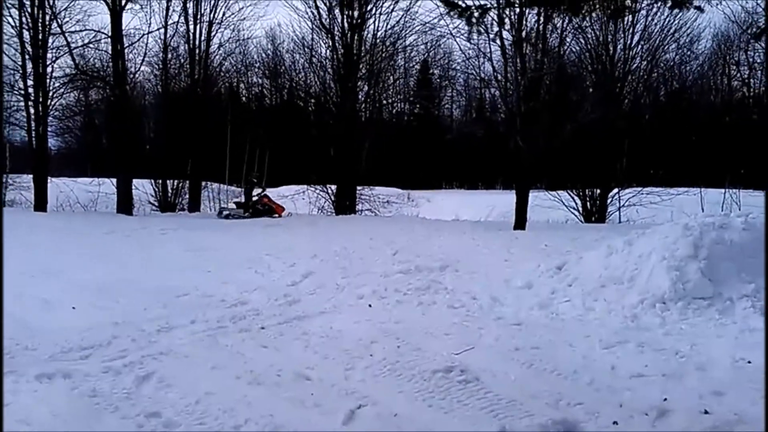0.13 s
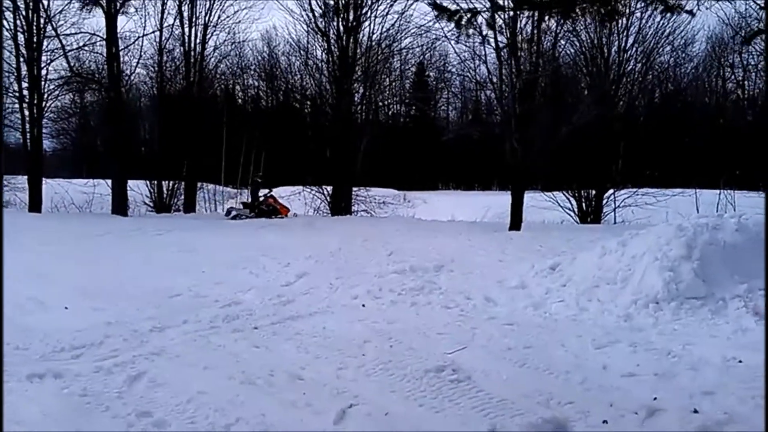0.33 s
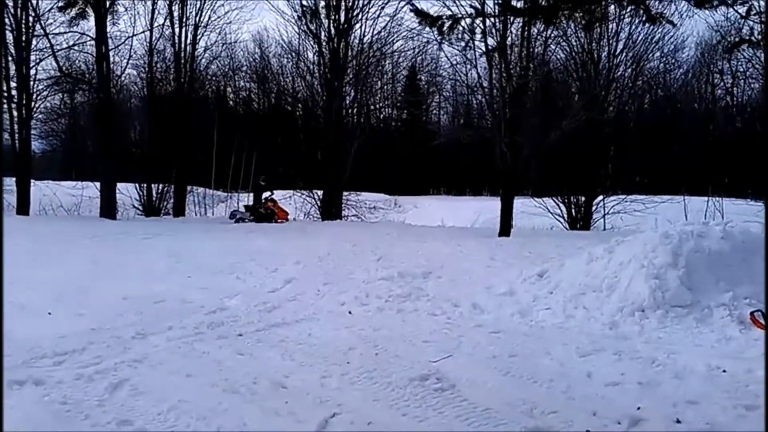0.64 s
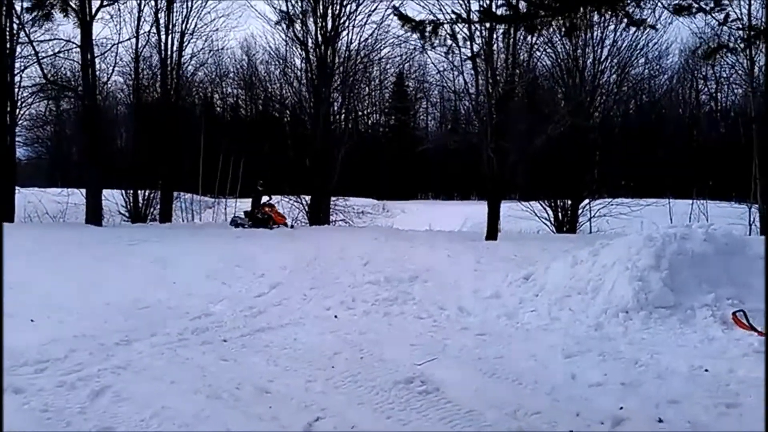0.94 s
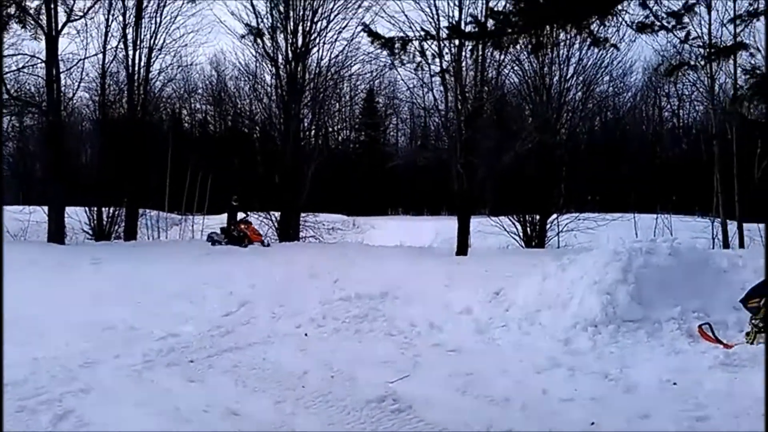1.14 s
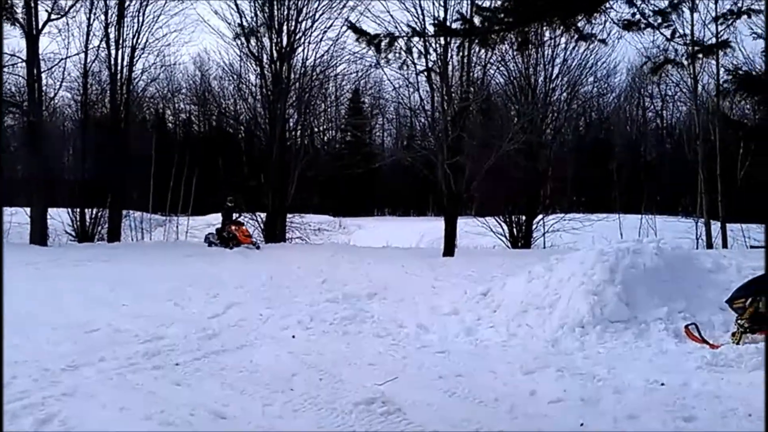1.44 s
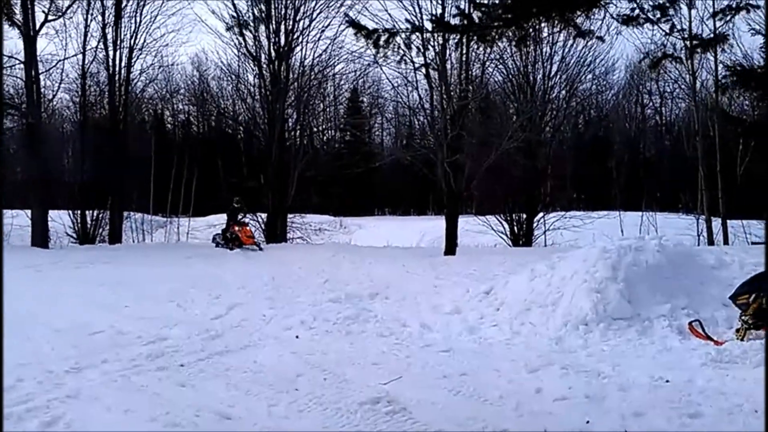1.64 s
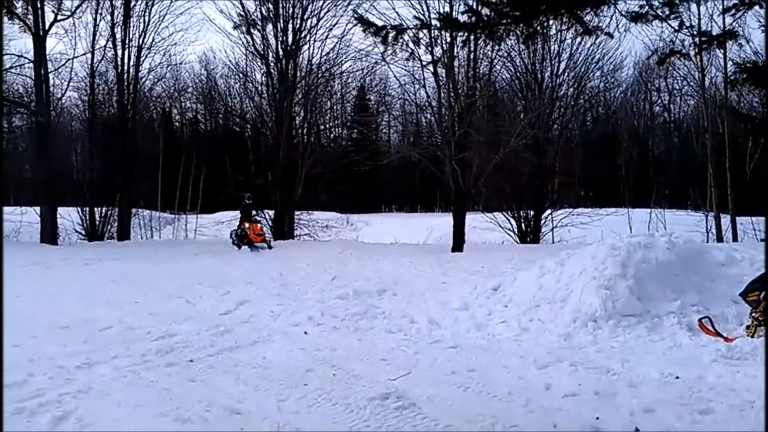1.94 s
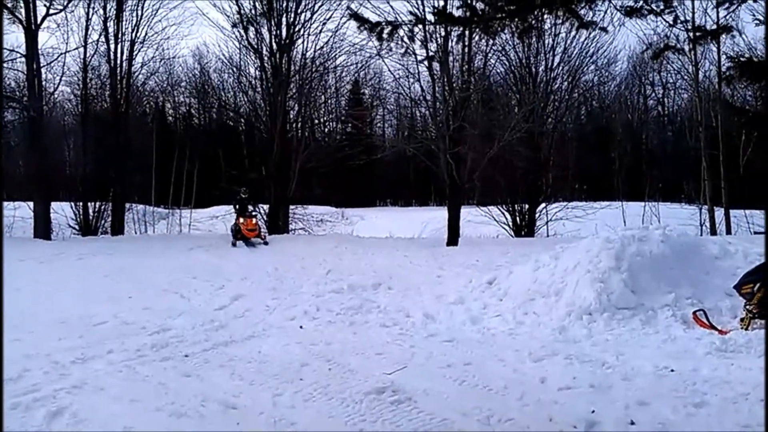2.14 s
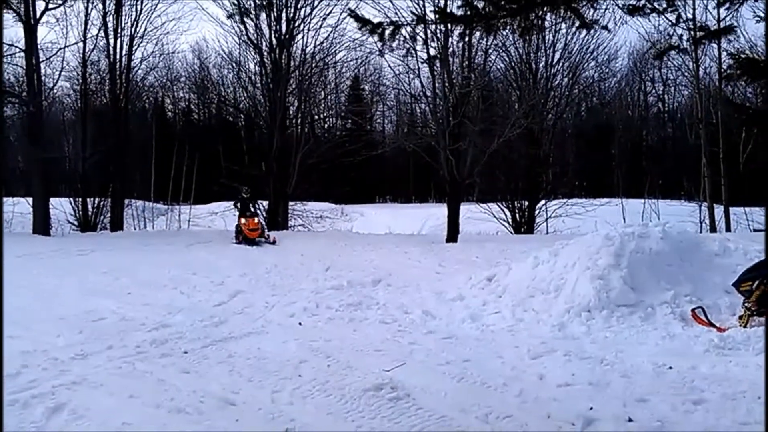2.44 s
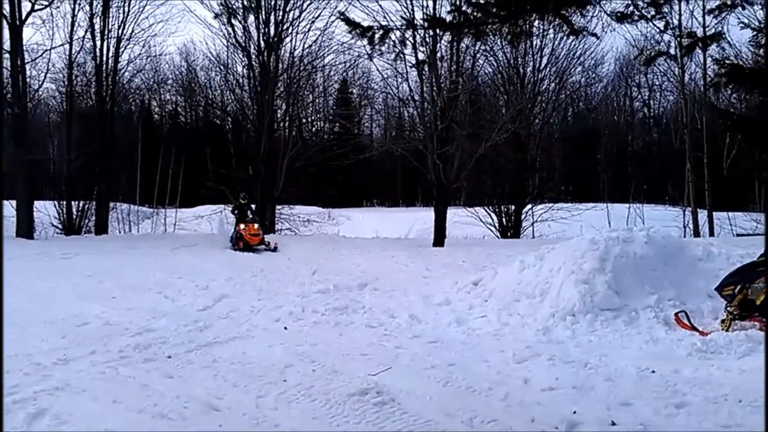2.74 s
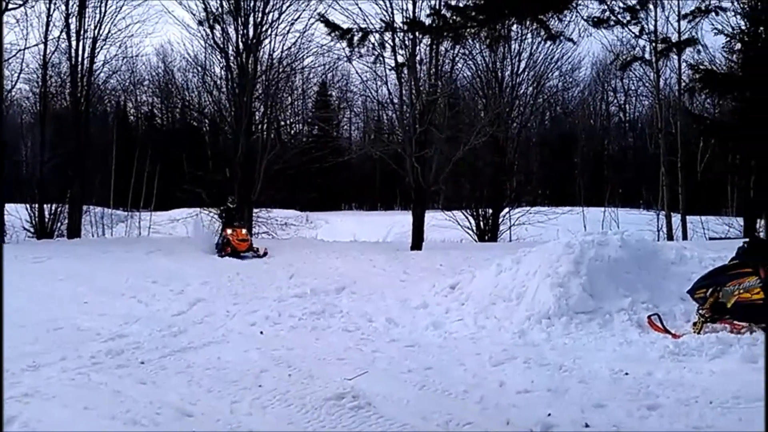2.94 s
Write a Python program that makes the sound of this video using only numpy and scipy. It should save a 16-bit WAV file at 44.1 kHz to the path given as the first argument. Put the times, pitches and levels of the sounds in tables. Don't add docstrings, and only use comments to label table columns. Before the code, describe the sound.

A two-stroke snowmobile some way off gives three short raspy throttle bursts, then accelerates with climbing pitch, while boots crunch snow nearby; open snowy field by trees, thin handheld camera microphone with little bass.

```python
import sys
import numpy as np
from scipy import signal
from scipy.fft import rfft, irfft, next_fast_len
from scipy.io import wavfile
from scipy.ndimage import uniform_filter1d, minimum_filter1d, map_coordinates

SR = 44100
rng = np.random.default_rng(int(sys.argv[2]) if len(sys.argv) > 2 else 0)


def to_wav(sig):
    pcm = np.clip(np.atleast_2d(sig), -1, 1) * 32767
    pcm = np.round(pcm).astype(np.int16)
    wavfile.write(sys.argv[1], SR, pcm.T)


def ratio_of_db(decibels):
    return 10 ** (np.asarray(decibels, float) / 20)


N = 136710
TIME_S = np.arange(N) / SR

# freq_hz, density_db_per_hz
SNOW_HISS = [(1470, -42), (2500, -4), (2620, -9), (4120, -4.5), (5180, -12), (5960, -12.5), (7410, -17.5),
             (8050, -14), (10200, -22), (13200, -68), (22000, -120)]


def unit(x):
    return x / np.sqrt(np.mean(x ** 2) + 1e-20)


def along(points, hz):
    f, v = np.transpose(points)
    return np.interp(np.log(hz + 1), np.log(f + 1), v)


def curve(rows):
    s, v = np.transpose(rows)
    return np.interp(TIME_S, s, v)


def bell(centre_s, half_s):
    return np.exp(-((TIME_S - centre_s) / half_s) ** 2)


def wobble(rate):
    return map_coordinates(rng.standard_normal(int(N * rate / SR) + 4), [np.arange(N) * rate / SR])


def filtered(x, response):
    m = next_fast_len(N + SR // 2)
    return irfft(rfft(x, m) * response(np.fft.rfftfreq(m, 1 / SR)), m)[..., :N]


def coloured(x, spectrum):
    return unit(filtered(x, lambda hz: ratio_of_db(along(spectrum, hz))))


def patchy(patchy_db):
    z = signal.stft(rng.standard_normal(N), nperseg=512)[2]
    field = uniform_filter1d(rng.standard_normal(z.shape), 4, 0)
    field = uniform_filter1d(field, 5, 1)
    broad = uniform_filter1d(uniform_filter1d(field, size=5, axis=0), size=16, axis=1)
    field = unit(field) + 0.31 * unit(broad)
    return unit(signal.istft(z * ratio_of_db(patchy_db * unit(field)), nperseg=512)[1][:N])


def engine():
    # time_s, speed_rev_per_s
    coast_speed = [(0, 77), (.55, 66), (.62, 63), (.8, 76), (1.1, 66), (1.45, 61)]
    blip_speed = [(1.52, 65), (1.64, 81), (1.69, 80)]
    pull_speed = [(2.05, 65.0), (2.108, 67.8), (2.198, 80.6), (2.392, 74.0), (2.482, 77.0), (2.664, 92.9),
                  (2.848, 106.7), (2.97, 113.4), (3.1, 116.4)]
    # time_s, exhaust_level_db
    load_rows = [(0, -27), (.13, -45), (.59, -44.5), (.67, -19.5), (.81, -24.5), (.85, -36.5),
                 (1.45, -41.5), (1.53, -20.5), (1.64, -22.5), (1.69, -35), (1.97, -44), (2.035, -30),
                 (2.065, -24), (2.17, -20.5), (2.2, -25.5), (2.33, -31), (2.5, -24.5), (3.1, -28.5)]
    # time_s, share_0_to_1
    even_rows = [(0, .1), (1.5, .1), (1.62, .35), (1.72, .15), (2.05, .15), (2.2, .5), (2.45, .42),
                 (2.7, .58), (3.1, .7)]
    # crank_multiple, time_s, half_length_s, level_db_over_exhaust
    song_orders = [(4, 1.6, 0.067, -22), (4, 2.142, 0.068, -15.5), (4, 2.47, 0.12, -18),
                   (5, 1.6, 0.043, -37.5), (5, 1.3, .1, -42), (4, 2.74, 0.069, -13.5),
                   (5, 2.73, 0.056, -12.5), (4, 2.99, 0.14, -20), (2, 2.994, 0.16, -24.5),
                   (6, 3.04, 0.071, -11.5), (7, 3.03, 0.063, -13.5), (10, 2.5, 0.036, -8),
                   (14, 0.92, 0.018, -8), (10, 2.87, 0.13, -6), (22, 3.04, 0.11, -15.5),
                   (23, 3.05, 0.082, -17), (4, 2.28, 0.096, -28), (17, 2.3, 0.054, -10),
                   (8, 2.537, 0.063, -30), (9, 2.722, 0.079, -11.5), (7, 2.1, 0.086, -30.5),
                   (14, 2.79, 0.048, -3), (4, 2.62, .05, -23), (5, 2.63, 0.037, -22),
                   (10, 2.53, 0.035, -20), (5, 2.08, 0.037, -19.5), (8, 2.21, .04, -16.5),
                   (15, 1.7, 0.034, -11.5), (11, 2.9, 0.062, -10.5), (12, 2.5, 0.041, -14.5),
                   (18, 2.93, 0.042, -11), (21, 2.9, .05, -12), (15, 3, 0.048, -7)]
    # time_s, half_length_s, exhaust_db, rasp_db
    stumbles = [(0.607, 0.017, 7.5, 12.5), (0.674, .008, 1, 1.5), (0.709, 0.0068, -3.5, 4.5),
                (0.719, 0.005, -4, -4), (0.738, 0.006, 1.5, 2), (.77, .025, -1, 0.5), (0.827, .015, -2, -4),
                (1.434, .012, 7.5, -4), (1.485, 0.019, 5.5, 10), (1.532, 0.011, -0.5, -0.5),
                (1.582, .006, 3.5, 4), (1.612, 0.0059, -2.5, -4), (1.633, 0.01, 0, -0.5),
                (1.665, 0.017, 0.5, -12), (1.988, 0.019, 5, 8), (2.07, 0.013, 2.5, 3),
                (2.11, 0.023, -2.5, -4), (2.146, .008, 3, 0.5), (2.16, 0.011, 3, 4), (2.187, 0.013, -3, -8),
                (2.238, 0.013, 1, -4), (2.376, 0.052, 1, -7), (2.43, 0.022, -1.5, -3.5),
                (2.464, 0.013, 1.5, 0), (2.6, .015, -1, -2), (2.779, 0.013, 3, 1.5)]
    # freq_hz, density_db_per_hz
    exhaust_low = [(200, -52), (330, -22), (600, -19.5), (800, -10), (930, -12.5), (1200, 1), (1600, -7),
                   (1930, 0)]
    exhaust_high = [(2250, -11.5), (2800, -24.5), (3700, -27.5), (6400, -120)]
    rasp_spectrum = [(1350, -37), (2300, -9), (2820, -13), (3200, -0.5), (3430, -11.5), (4260, -5.5),
                     (7050, -14.5), (8550, -10.5), (10200, -26.5), (13200, -82), (22000, -120)]

    speed = curve(list(coast_speed) + list(blip_speed) + [(1.98, 60.17)] + list(pull_speed))
    speed = uniform_filter1d(speed, size=1500, mode="nearest")
    crank = 2 * np.pi * np.cumsum(speed) / SR
    load_db, even = curve(load_rows), curve(even_rows)
    rasp_db = -43.5 + (load_db + 25)
    for s, half_s, exhaust_step_db, rasp_step_db in stumbles:
        load_db = load_db + exhaust_step_db * bell(s, half_s)
        rasp_db = rasp_db + rasp_step_db * bell(s, half_s)

    pipe = [(110, -100)] + list(exhaust_low) + list(exhaust_high)
    order = {}
    for k in range(2, 42):
        drift = 1.6 * wobble(4) + .3 * wobble(40)
        order[k] = np.cos(k * crank + np.tanh(k / 8) ** 2 * drift)
    stack = sum(ratio_of_db(along(pipe, k * speed) + 2.2 * wobble(11)) * order[k] for k in range(6, 42))
    stack *= np.sqrt(speed / speed.mean())
    drone = 0
    for k, s, half_s, level_db in song_orders:
        drone = drone + ratio_of_db(level_db) * np.exp(-((TIME_S - s) / half_s) ** 4) * order[round(k)]

    gate = 1 + 0.15 * np.cos(crank) + 0.19 * np.cos(2 * crank + wobble(5.56))
    puff_cut_hz = 360
    puffs = coloured(patchy(patchy_db=1.5) * gate * ratio_of_db(0.73 * wobble(60)), pipe)
    puffs = filtered(puffs, lambda hz: (1j * hz / (puff_cut_hz + 1j * hz)) ** 2)
    exhaust = np.sqrt(even) * unit(stack) + drone + np.sqrt(1 - even) * puffs
    rasp = coloured(patchy(patchy_db=1.85) * gate * ratio_of_db(0.66 * wobble(25.36)), rasp_spectrum)
    lurch_db = .6 * wobble(24.38)
    return ratio_of_db(load_db + lurch_db) * exhaust + ratio_of_db(rasp_db) * rasp


def boots():
    # start_s, length_s, thud_db, thud_hz, crackle_db
    crunches = [(0.039, 0.064, -42, 800, -43.5), (0.391, 0.064, -53, 550, -57),
                (.6, 0.11, -37.5, 330, -42.5), (0.801, .25, -59, 210, -62), (0.696, 0.024, -28, 680, -56),
                (0.711, 0.062, -38, 334, -37.5), (1.068, 0.061, -42, 640, -38.5),
                (1.419, 0.16, -47, 358, -53), (1.799, 0.18, -52.5, 250, -60.5), (1.922, .17, -45, 308, -54),
                (0.118, 0.48, -58.5, 237, -67), (1.002, 0.46, -63.5, 224, -62), (1.998, .2, -54, 260, -58),
                (2.599, .06, -60.5, 218, -65)]
    # start_s, peak_db
    ticks = [
        (.0553, -22),
        (.0708, -21),
        (1.077, -23),
        (1.0925, -23),
        (1.1012, -22),
    ]
    # start_s, peak_db, pitch_hz
    knocks = [(.615, -31, 360), (.632, -31, 310), (.662, -32, 320), (.699, -18, 305), (.718, -30, 310),
              (1.893, -33, 290), (1.912, -32, 340), (1.93, -35, 290), (1.972, -35, 290), (2.012, -34, 300),
              (2.04, -34, 310)]

    sound = np.zeros((2, N + SR))
    lean = ratio_of_db(-3.5 * np.array([[.5], [-.5]]))
    half_second = SR // 2
    t, tick_t = np.arange(half_second) / SR, np.arange(900) / SR
    freq_hz = np.fft.rfftfreq(half_second, 1 / SR)
    bandwidth_over_pitch, common = .55, .35

    crackle = rng.standard_normal((2, N)) * ratio_of_db(1.8 * wobble(300))
    crackle = filtered(crackle, lambda hz: ratio_of_db(along(SNOW_HISS, hz)))
    swell = np.zeros(N)
    for s, length_s, thud_db, pitch_hz, crackle_db in crunches:
        swell += ratio_of_db(crackle_db) * np.exp(-((TIME_S - s) / length_s * 2 - 1) ** 2 * 1.1)
        centre, *each = rng.standard_normal((3, half_second))
        noise = np.sqrt(common) * centre + np.sqrt(1 - common) * np.array(each)
        damping = 1j * freq_hz * pitch_hz * bandwidth_over_pitch
        band = damping / (pitch_hz ** 2 - freq_hz ** 2 + damping)
        thud = irfft(rfft(noise) * band ** 2, half_second)
        thud = unit(thud * np.exp(-2 * (t / length_s * 2 - 1) ** 2))
        thud *= np.sqrt(length_s * SR / half_second)
        sound[:, round(s * SR):][:, :half_second] += ratio_of_db(thud_db) * lean * thud
    for s, peak_db in ticks:
        phase = 2 * np.pi * (1000 * tick_t + 1.1 * (1 - np.exp(-tick_t / .001)))
        chirp = np.sin(phase) * np.tanh(tick_t / .0008)
        sound[:, round(s * SR):][:, :len(tick_t)] += ratio_of_db(peak_db + 6.5 - 60 * tick_t / .011) * chirp
    for s, peak_db, pitch_hz in knocks:
        knock = np.sin(2 * np.pi * pitch_hz * t) + 0.46 * np.sin(2 * np.pi * 1.6 * pitch_hz * t)
        envelope = ratio_of_db(peak_db - 60 * t / .07) * np.tanh(t / 0.0024)
        sound[:, round(s * SR):][:, :half_second] += envelope * lean * knock
    return sound[:, :N] + swell * unit(crackle)


def track():
    # freq_hz, density_db_per_hz
    churn_spectrum = [(88, -76.5), (190, -40), (284, -7.5), (394, -8.5), (506, -8.5), (775, 0.5),
                      (923, -1.5), (2140, -4.5), (3000, -26.5), (3900, -58.5), (6600, -120)]
    churn_db = -41.5 + 0.4 * wobble(8.77) + 1.0 * wobble(140)
    churn = ratio_of_db(churn_db) * coloured(patchy(patchy_db=0.9), churn_spectrum)
    hiss_db = -48 + 0.55 * wobble(7.6)
    return churn + ratio_of_db(hiss_db) * coloured(patchy(patchy_db=-1.0), SNOW_HISS)


def ports(x):
    # freq_hz, share_0_to_1
    likeness = [(120, .4), (260, 0.57), (530, .8), (1100, 0.87), (2270, 0.76), (4700, 0.61), (9730, 0.14)]
    # freq_hz, level_db
    lean_rows = [(60, 5.0), (140, 3), (330, 3.5), (760, 3.5), (1780, 4.5), (4170, -2.5), (9730, -9.5)]
    # freq_hz, phase_rad
    lead_rows = [(0, -0.27), (2240, 0.37), (2930, -0.84), (4050, -0.95), (4390, -0.12), (6720, 0.62),
                 (7490, 0.1), (9910, -0.1)]

    t = np.arange(SR // 5) / SR
    trees_t60_s = .1
    hop = round(.2 * SR)
    fade = np.sin(np.pi * np.arange(2 * hop) / (2 * hop))
    scattered, padded = np.zeros((2, N + 2 * SR)), np.pad(x, (hop, 2 * hop))
    for k in range(0, N + hop, hop):
        tails = rng.standard_normal((2, len(t))) * ratio_of_db(-60 * t / trees_t60_s)
        tails /= np.linalg.norm(tails, axis=1, keepdims=True)
        piece = padded[k:k + 2 * hop] * fade
        echo = signal.fftconvolve(piece[None], tails, axes=1)
        scattered[:, k:k + echo.shape[1]] += echo
    scattered = scattered[:, hop:hop + N]

    def alike(hz):
        return np.clip(along(likeness, hz), 0, 1)

    mix = filtered(x, lambda hz: np.sqrt(alike(hz)))
    mix = mix + filtered(scattered, lambda hz: np.sqrt(1 - alike(hz)))
    side = np.array([[.5], [-.5]])
    return filtered(mix, lambda hz: ratio_of_db(side * along(lean_rows, hz)) * np.exp(1j * side * along(lead_rows, hz)))


def overload():
    # time_s, half_length_s, thump_db, splatter_db
    overloads = [
        (0.638, 0.0095, -72, -87),
        (0.695, 0.023, -52.5, -59.5),
        (0.772, .01, -78, -82),
        (1.085, 0.011, -71, -89),
        (1.566, 0.03, -64, -61.5),
        (1.639, .012, -58, -85),
        (2.082, .015, -62, -67),
        (2.161, 0.026, -56, -58),
        (2.777, .015, -67, -74),
    ]
    # freq_hz, density_db_per_hz
    thump_spectrum = [(20, -12), (90, -2.5), (200, -1.5), (500, -28.5), (1000, -120)]
    splatter_spectrum = [(6000, -120), (9500, -11), (11000, 8.5), (13000, -6.5), (15200, -18)]

    centre, *each = rng.standard_normal((3, N))
    thump_gain = sum(ratio_of_db(thump_db) * bell(s, half_s) for s, half_s, thump_db, _ in overloads)
    fizz_gain = sum(ratio_of_db(splatter_db) * bell(s, half_s) for s, half_s, _, splatter_db in overloads)
    thump = thump_gain * coloured(centre + 1.6 * np.array(each), thump_spectrum)
    fizz = fizz_gain * coloured(centre * ratio_of_db(3 * wobble(280)), splatter_spectrum)
    return (thump + fizz) * ratio_of_db(7 * np.array([[.5], [-.5]]))


def scene():
    return ports(engine() + track()) + boots()


def low_pass(x):
    return signal.sosfilt(signal.butter(12, 15300, fs=SR, output="sos"), x)


def record(dry):
    # freq_hz, gain_db
    port_response = [(3000, 1.5), (6300, -1), (7050, -7), (7450, 1), (8100, 4.5), (9300, 1.5),
                     (10500, -4.5), (13000, -33.5)]
    bass_cut_hz = 226
    limit, knee, smooth_samples = .275, 9, 41

    x = filtered(dry, lambda hz: (1j * hz / (bass_cut_hz + 1j * hz)) ** 3 * ratio_of_db(along(port_response, hz)))
    needed = 1 / (1 + np.abs(x / limit) ** knee) ** (1 / knee)
    gain = minimum_filter1d(needed, size=2 * smooth_samples, axis=1)
    for _ in range(2):
        gain = uniform_filter1d(gain, size=smooth_samples, axis=1)
    return low_pass(x * gain + overload())


dry = scene()
out = record(dry)
to_wav(out)
```